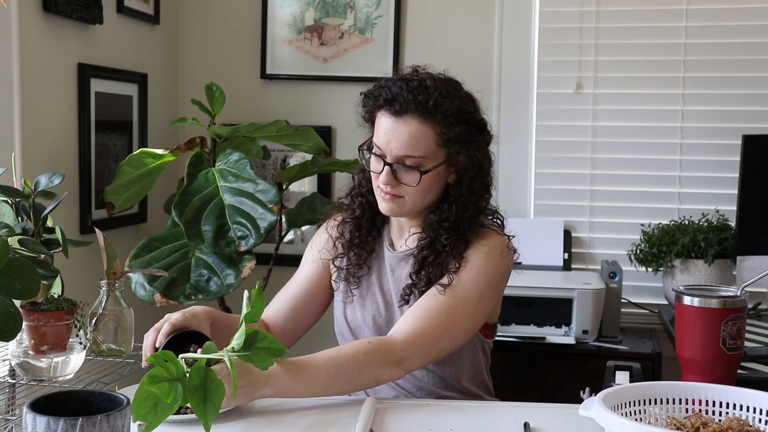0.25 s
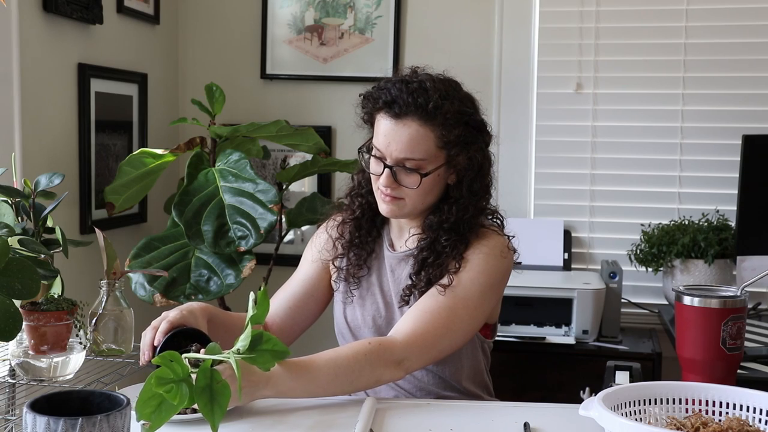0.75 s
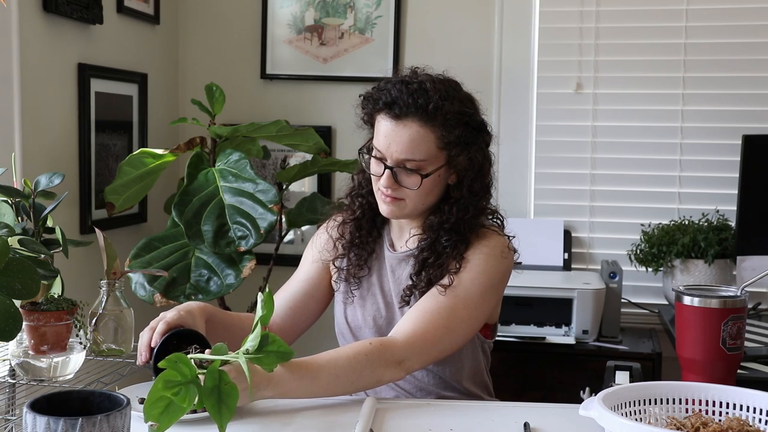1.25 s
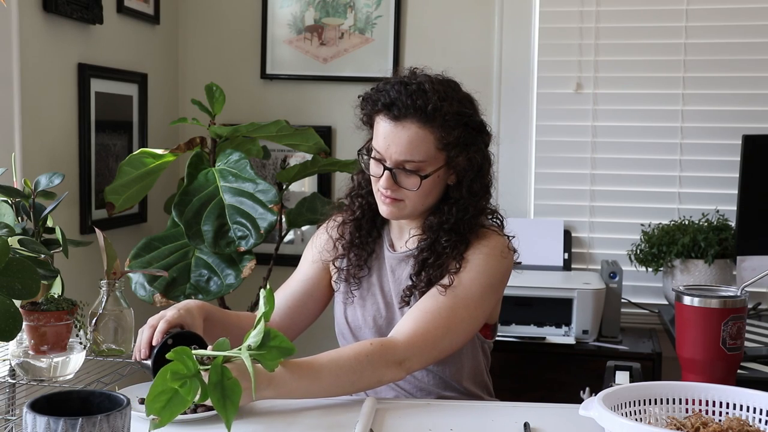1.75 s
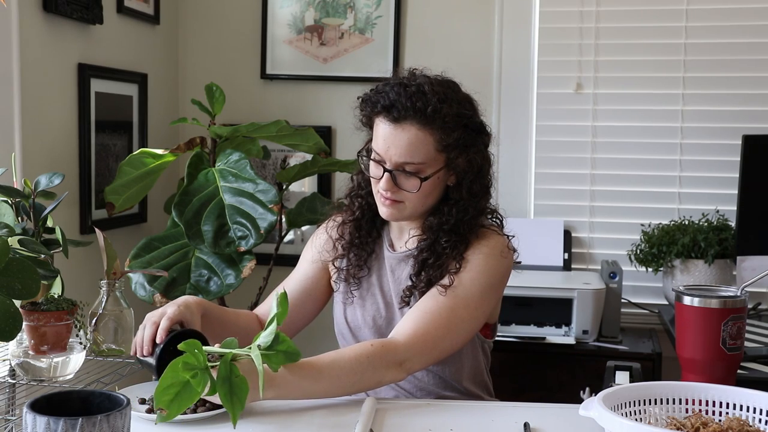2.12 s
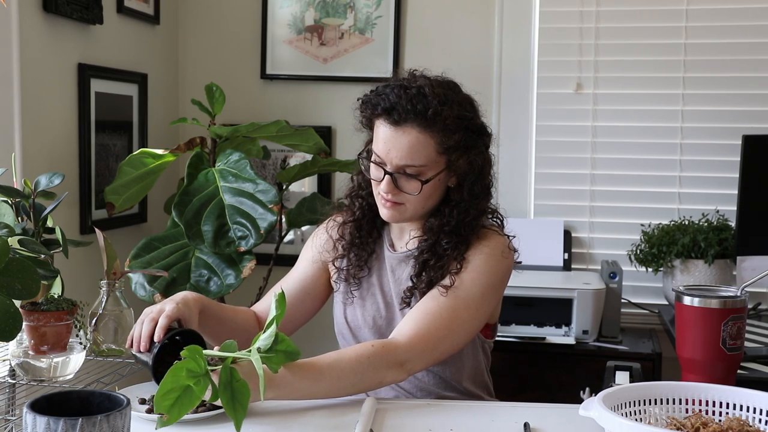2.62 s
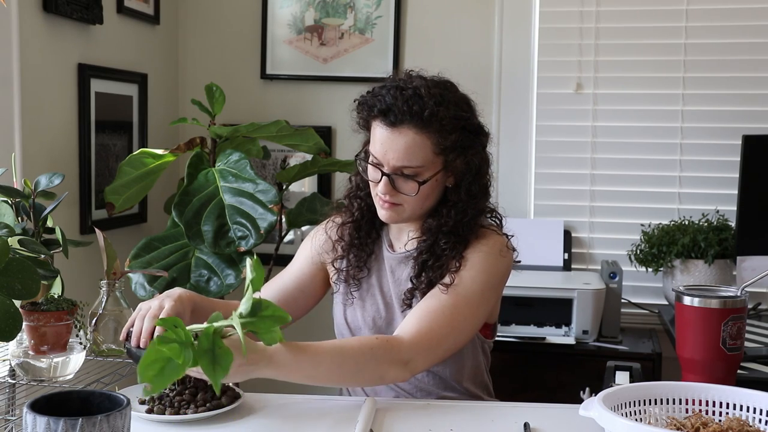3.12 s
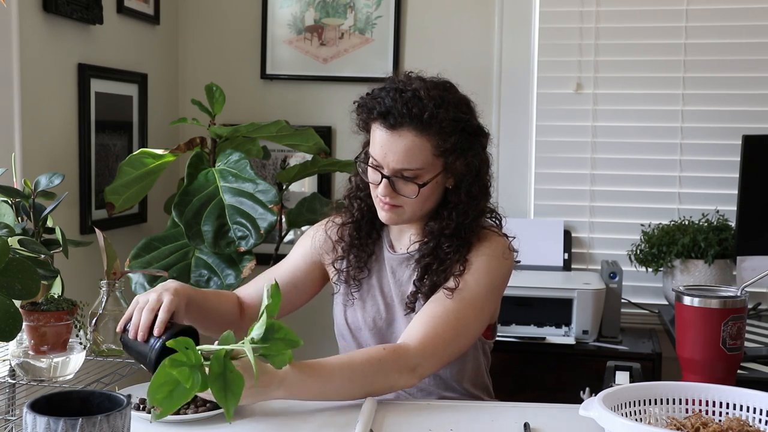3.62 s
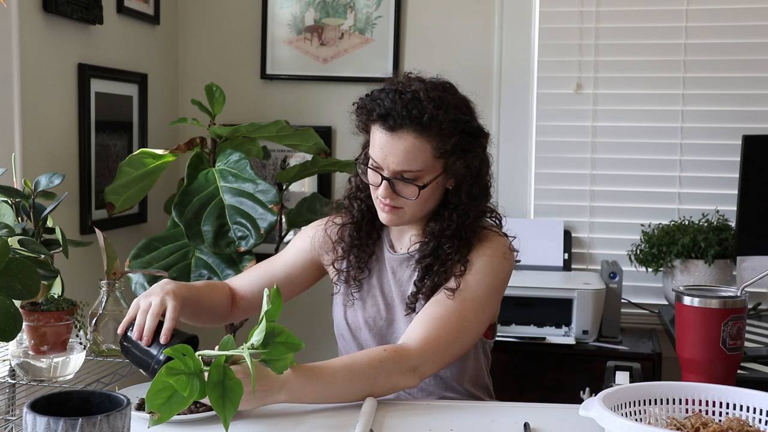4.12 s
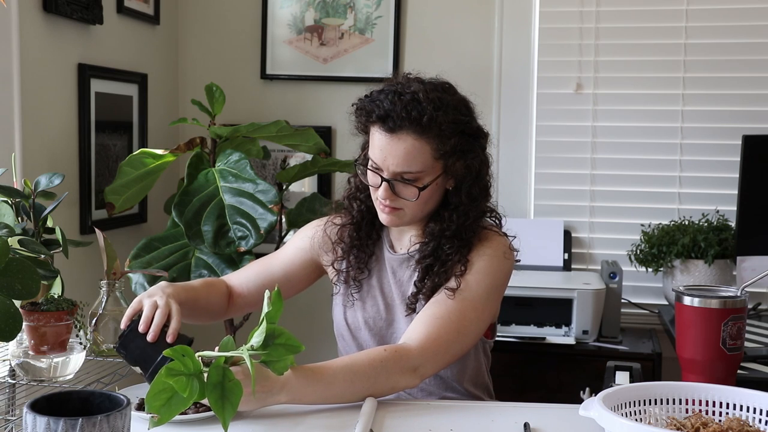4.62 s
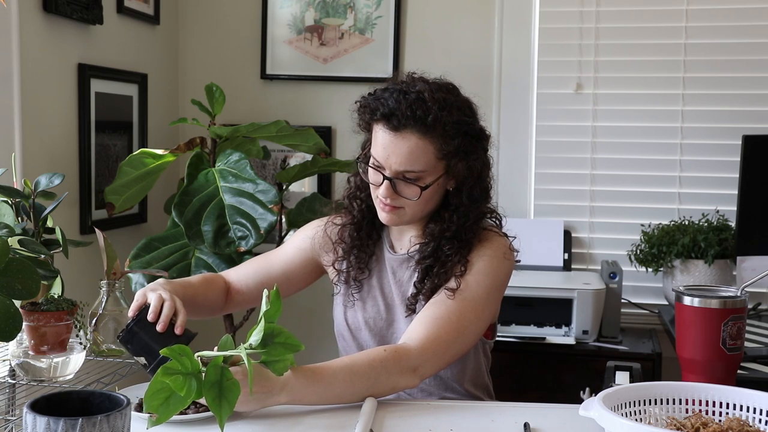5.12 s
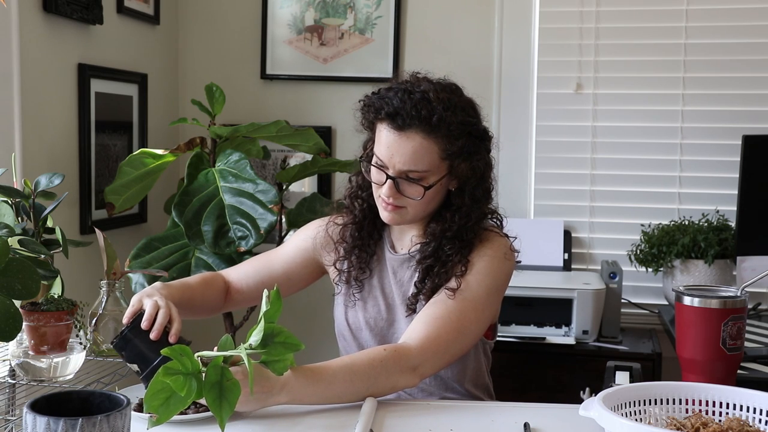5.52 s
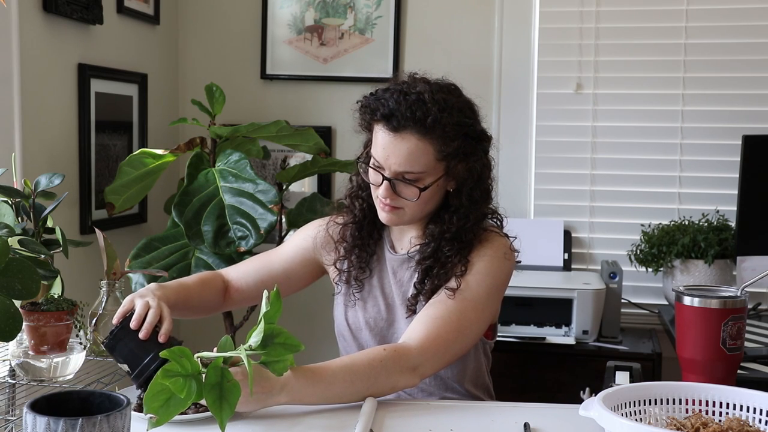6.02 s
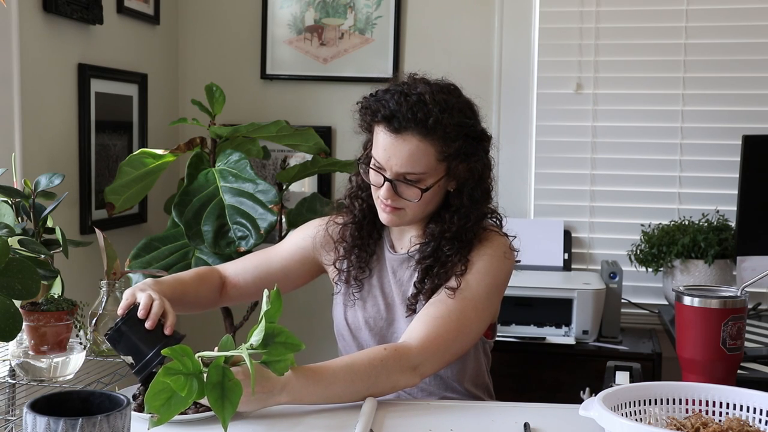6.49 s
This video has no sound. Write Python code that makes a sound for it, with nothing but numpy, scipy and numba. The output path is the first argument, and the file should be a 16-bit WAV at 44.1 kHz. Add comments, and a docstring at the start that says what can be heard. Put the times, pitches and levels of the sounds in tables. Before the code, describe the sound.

A small plant pot of porous clay pebbles is shaken and tipped over a ceramic plate indoors. Hollow, gritty scrapes alternate with single dry clicks, high glassy ticks, little bounces and thin trickles, with faint thuds beneath. Activity thins after two seconds, gathers in the middle, then peaks near five and a half with a bright tabletop crack before easing. Near microphone, short room tail, faint steady hush.

```python
"""In a small room, light clay pebbles are worked loose in a small plastic pot and tipped onto a glazed plate.
In the pot they grind and crackle: dense random contacts, coloured by filters, plus single dry clicks.
Falling pebbles tick as short noise and ring damped modes of the plate; they bounce, trickle and thud below.
One cracks onto the table as bright noise. The room adds a short diffuse tail and a soft hush of noise."""
import sys
import numpy as np
from scipy import signal
from scipy.fft import rfft, irfft
from scipy.io import wavfile
from scipy.ndimage import uniform_filter1d
from numba import njit

SR = 44100
rng = np.random.default_rng(int(sys.argv[2]) if len(sys.argv) > 2 else 0)


def dump_mix(stems):
    """Bounce the given channels to the path in sys.argv[1] as a 16-bit WAV at rate SR."""
    frames = np.atleast_2d(stems).T  # one column per channel
    limited = np.clip(frames, -1, 1)  # hard clip at full scale
    pcm = np.round(limited * 32767).astype(np.int16)
    wavfile.write(sys.argv[1], SR, pcm)


N = 297790
TIME = np.arange(N) / SR  # seconds

# room hush, spectral shape: freq_hz, level_db
HUSH_COLOUR = [(20, -1), (65, 3.5), (110, -4), (180, -11.5), (270, -10), (400, -15.5), (1200, -7.5),
               (2500, -12.5), (6000, -10.5), (10000, -38), (16000, -29)]
HUSH_DB = -59.5
# room decay: freq_hz, t60_s
ROOM_T60 = [(200, 1), (1500, 0.54), (4000, 0.33), (8000, 0.4), (15000, 0.44)]
TOP_HZ = 15900  # upper limit of the finished sound

# pebbles shifting as the pot is slowly turned: start_s, grinding_db, crackle_db (before the two gains below)
POT_TURNING = [(0.0, -45, -46.5), (0.88, -67.5, -65), (1.18, -54, -68), (1.35, -45, -43),
               (1.61, -59.5, -64), (1.86, -57, -59.5), (2.08, -53.5, -53.5), (2.41, -50.5, -54.5),
               (2.93, -53.5, -59), (3.33, -53.5, -52), (3.99, -59.5, -60), (4.75, -49, -51),
               (5.22, -54, -56), (5.53, -49, -55), (5.64, -50, -51), (5.81, -58, -56), (6.32, -53, -56.5),
               (6.75, -59, -64)]
GRIND_DB, CRACKLE_DB = 2, 4  # gains on the turning alone
# shakes that make the packed pebbles give way: start_s, length_s, grinding_db, crackle_db
POT_SHAKES = [(0.0, 0.086, -43.5, -51), (0.253, .025, -43.5, -49), (0.692, 0.044, -53, -48),
              (1.16, 0.078, -47, -51), (1.233, .11, -41.5, -42.5), (2.17, 0.042, -52, -52),
              (4.502, 0.027, -42.5, -47), (4.643, .04, -39, -54), (4.754, 0.014, -51, -43),
              (5.177, 0.036, -48, -43), (5.307, 0.078, -46, -53), (5.433, 0.16, -46, -41.5),
              (5.697, 0.086, -59, -45.5), (6.323, 0.037, -51, -62), (6.536, 0.059, -50, -51)]
SHAKE_ATTACK_S, SHAKE_RELEASE_S = 0.018, 0.011
# spectral shape of packed pebbles grinding: freq_hz, level_db
GRIND_COLOUR = [(30, -33), (130, -17.5), (260, -11), (400, -10.5), (740, -5.5), (950, -4), (1100, 0.5),
                (1330, 1), (1640, -6), (2300, -5.5), (3500, -11), (7000, -21.5), (16000, -32)]
# spectral shape of loose pebbles crackling: freq_hz, level_db
CRACKLE_COLOUR = [(30, -59), (300, -24), (1200, -10), (2400, 7), (4500, 3.5), (7500, 0.5), (9500, -8.5),
                  (13000, -16), (16000, -25)]

# dry clicks of pebble on pebble: start_s, level_db (before the gain in clicks), hardness_db_per_octave
PEBBLE_CLICKS = [(1.134, -32, 0), (1.5044, -30, -8), (2.341, -24.5, 11), (2.5616, -30, 5),
                 (2.7085, -34.5, 8), (3.0047, -32, 14), (3.128, -27, 5), (3.6587, -27, -5), (4.425, -24, 2),
                 (4.527, -34, -2), (4.759, -25.5, -3), (4.7857, -28, 6), (4.805, -28, -5), (4.959, -25, -4),
                 (5.3099, -16, -1), (5.341, -22, 8.5), (5.358, -21, -3), (5.424, -19, 2), (5.455, -21, 1),
                 (5.58, -22.5, -3), (6.033, -25.5, -3), (6.1777, -27, 2.5), (6.6052, -29, 4),
                 (6.625, -29, 2)]
# spectral shape of a click: freq_hz, level_db
CLICK_COLOUR = [(30, -24), (300, -10), (1200, -6.5), (4500, 7.5), (7500, 0), (10000, -13.5), (14000, -12),
                (16000, -38)]

# a pebble cracks onto the table: start_s, level_db (before the gain in table)
TABLE_HITS = [(5.6777, -16), (5.681, -25), (5.72, -35)]
# spectral shape of that crack: freq_hz, level_db
TABLE_COLOUR = [(30, -30), (240, -2.5), (600, -21), (1500, 2.5), (2400, 6), (5400, 9), (8000, 10),
                (10000, 0.5), (13500, -4.5), (16000, -21)]

# single contacts of pebbles with the plate: start_s, rim_ring_db, base_ring_db, hardness_db_per_octave
PLATE_HITS = [(0.0148, -55, -29.5, -7), (0.2433, -43, -28, -10), (0.4491, -55, -43.5, 12),
              (0.9291, -56, -38, -6.5), (1.1319, -50, -38.5, -2), (1.1848, -38, -46, -13),
              (1.242, -36, -28.5, -5.5), (1.286, -26, -34, -5), (1.3044, -33, -32, -7),
              (1.3531, -31.5, -44, -11), (1.7593, -61, -43.5, 1), (1.8868, -32, -37.5, -9),
              (1.9666, -37, -26, -3), (2.017, -52, -34, 0.5), (2.1816, -24, -55, -3),
              (2.1888, -25, -32, 0.5), (2.2928, -50, -24.5, -3.5), (2.3785, -28.5, -30, 1),
              (2.4371, -25.5, -40, 3.5), (2.561, -35, -54, -13.5), (3.1278, -60, -18.5, -5.5),
              (3.1817, -19, -39, -5), (3.2247, -23.5, -33, -9.5), (3.2696, -30, -38, -10),
              (3.3727, -55, -25.5, -1.5), (3.4025, -71, -25.5, -7.5), (3.471, -32, -52, -10),
              (3.5335, -28, -46, -4), (3.6444, -20, -31, -1), (3.6582, -31, -20.5, -1.5),
              (3.6938, -22.5, -48, -1.5), (3.7044, -24.5, -41, -3), (3.7389, -21.5, -36, 3),
              (3.8714, -70, -44, 5), (4.0708, -35, -28, 0), (4.127, -17.5, -29, 1.5), (4.3501, -31, -46, 0),
              (4.863, -51, -34, -6), (4.9188, -36, -38, 3), (5.1088, -35, -36, -4), (5.1723, -29, -33, 3.5),
              (5.1803, -22.5, -49, 2), (5.2771, -52, -34, -2.5), (5.4224, -23, -37, 6),
              (5.542, -20, -37, 0), (5.5623, -22, -26.5, -1), (5.5788, -15.5, -38, 5),
              (5.6588, -26, -50, 6), (5.9612, -36, -33, -6.5), (6.0457, -32, -32, 0.5),
              (6.1096, -44, -33, 3), (6.186, -29, -40, 4.5), (6.2585, -25, -31, 0.5),
              (6.3954, -20.5, -39, 1), (6.4602, -35, -36, 4.5)]
# bounce series: first_contact_s, last_contact_s, rim_ring_db, base_ring_db, hardness_db_per_octave,
# speed_kept (share), contacts (count); the levels are those of the first contact
BOUNCERS = [(0.0794, 0.1203, -18, -27, -8, 0.48, 2), (0.2725, 0.4615, -20.5, -29.5, -0.5, 0.76, 4),
            (0.5547, 0.611, -65, -33.5, -7, 0.45, 2), (0.6887, 0.7225, -41.5, -33, -1, 0.91, 3),
            (1.504, 1.5682, -55, -31, -2, 1, 3), (3.0272, 3.0645, -46, -29.5, -3, 0.58, 2),
            (3.2893, 3.327, -34, -21.5, -3, 0.47, 2), (3.5483, 3.5955, -23.5, -37, -2, .56, 2),
            (4.202, 4.2974, -19, -49, -1.5, 0.83, 5), (4.4237, 4.457, -31, -31.5, -0.5, .6, 2),
            (5.4869, 5.518, -17.5, -30, 1, 0.4, 2)]
BOUNCE_DB = 6  # a blow weakens by this much each time the speed halves
# runs of small pebbles trickling onto the plate: start_s, length_s, level_db
SPILLS = [(0.0, 0.041, -39), (0.43, 0.088, -54), (1.26, .14, -41), (1.5, 0.11, -46.5), (2.04, 0.58, -51.5),
          (3.22, 0.36, -45.5), (3.72, 0.048, -49), (4.66, 0.395, -52.5), (5.31, 0.21, -46),
          (6.08, 0.1, -47), (6.33, 0.13, -54.5)]
SPILL_ATTACK_S, SPILL_RELEASE_S = 0.018, 0.033
STRAY_DB = -16  # stray pebbles that trickle all along, relative to grinding_db of the turning

# spectral shape of the tick of clay on glaze: freq_hz, level_db
TICK_COLOUR = [(30, -43), (150, -16), (250, -12.5), (450, -9.5), (700, -19), (1100, -13.5), (2300, -4.5),
               (3000, -14), (4000, 0), (5800, 2.5), (7000, 0.5), (7900, 4), (9200, -20), (13500, -8.5)]
TICK_DB = -9
SOFT_HZ = 1340  # below this, soft and hard contacts push alike

# Plate modes: pitch_hz is the centre of a wandering pitch, t60_s is scaled by PLATE_FREE.
# the glazed rim rings on: pitch_hz, level_db, t60_s
RIM_MODES = [(2266, -20.5, 0.073), (3520, -3, 0.035), (3720, -15, .012), (4893, -6, 0.039),
             (8020, -20, 0.085), (4932, -22, .17), (6428, -20, .35), (8126, -18.5, .18), (14332, -32, .13),
             (9960, -26, 0.11), (11140, -32, 0.14), (12075, -22.5, 0.076), (12800, -23, 0.036),
             (13750, -34, 0.098)]
# the plate's centre: pitch_hz, level_db, t60_s
CENTRE_MODES = [(1100, -30, 0.097), (2135, -9.5, 0.017), (3567, -4.5, 0.03), (5528, -3, 0.042)]
# the base, damped by the table and the heap: pitch_hz, level_db, t60_s
BASE_MODES = [(7620, -4, .022), (7740, -10, .05), (7985, -5.5, .055), (10290, -16, .07), (10430, -19, .04),
              (10785, -19, .09), (13480, -15, .035), (13745, -16, .06)]
# how freely the plate rings while hand and heap rest on it: start_s, ring_time_share
PLATE_FREE = [(0, 0.67), (.5, 0.52), (.7, 1.13), (2.0, 0.61), (3.2, 1.23), (4.2, 0.65), (5.6, 0.97),
              (6.7, 0.78)]
# the shifting heap covers more or less of the plate's centre: start_s, level_db
HEAP = [(0, -0.5), (0.4, -6), (0.55, 3), (1.6, 1), (2.4, -4.5), (3.2, -6.5), (4.1, -0.5), (5.4, -0.5),
        (6.7, -2.5)]
# the landing place wanders along the rim, favouring one mode at the cost of the next: start_s, favour_db
LANDING_SPOT = [(0.1, 0.5), (0.4, 6.5), (0.9, -7), (1.3, 5.5), (1.9, -11), (2.2, 4.5), (2.56, 3), (3.2, -9),
                (3.72, 2.5), (4.3, 0.5), (5.5, 0.5), (6.4, 1)]
SPOT_HZ, NEXT_HZ = 4900, 6428  # the favoured mode and the next
NEXT_SHARE = 0.87  # dB that the next mode loses for each dB gained
# pebbles thud through the plate into the table top: pitch_hz, level_db, t60_s
TABLE_MODES = [(172, -46, 0.065), (237.4, -37, 0.1), (277, -40, 0.21), (406, -27, 0.032)]


def undb(db):
    """Decibels to gain."""
    return 10 ** (np.asarray(db) / 20)


def unit(x):
    """Scale to rms 1."""
    return x / np.sqrt(np.mean(x ** 2))


def decay(t, t60):
    """Exponential fall of 60 dB in t60 seconds."""
    return np.exp(-np.log(1000) * t / t60)


def on_octaves(hz, points):
    """Read (Hz, value) points on a log-frequency axis."""
    f, value = np.transpose(points)
    return np.interp(np.log(np.maximum(hz, 1)), np.log(f), value)


def colour(x, points, tilt_db=0, size=1024):
    """Causal filter of unit energy with the given spectrum, tilted above SOFT_HZ in dB per octave."""
    hz = np.fft.rfftfreq(size, 1 / SR)
    level_db = on_octaves(hz, points) + tilt_db * np.log2(np.maximum(hz, SOFT_HZ))
    # folding the cepstrum forward gives minimum phase: the energy comes as early as it can
    cepstrum = irfft(np.log(undb(level_db)))
    cepstrum[1:size // 2] *= 2
    cepstrum[size // 2 + 1:] = 0
    response = irfft(np.exp(rfft(cepstrum)))
    return signal.fftconvolve(x, response / np.linalg.norm(response))[:len(x)]


def shelf(x, low_db, corner_hz=2200):
    """Raise or lower everything below the corner."""
    lows = signal.lfilter(*signal.butter(1, corner_hz, fs=SR), x)
    return x + (undb(low_db) - 1) * lows


def add(track, s, sound):
    """Mix a sound into a track at time s."""
    i = max(int(s * SR), 0)
    track[i:i + len(sound)] += sound[:max(N - i, 0)]


def walk(per_s):
    """Random levels held 1 / per_s seconds and slewed; rms 1."""
    hold = int(SR / per_s)
    stepped = rng.standard_normal(N)[np.arange(N) // hold]
    return unit(uniform_filter1d(stepped, hold))


def swells(rows, attack_s, release_s):
    """Gain of (s, length s, dB) movements: each rises, holds and dies away."""
    total = 0
    for s, length, db in rows:
        rise = np.clip((TIME - s) / attack_s, 0, 1)
        fall = np.exp(-np.maximum(TIME - s - length, 0) / release_s)
        total = total + undb(db) * rise * fall
    return total


def burst(t60, size=2048):
    """The crack of one contact: noise that dies within milliseconds."""
    return rng.standard_normal(size) * decay(np.arange(size) / SR, t60)


def contacts(per_s, spread_db):
    """Random contacts, mostly faint and a few strong; rms 1."""
    happens = rng.random(N) < per_s / SR
    strength = np.minimum(rng.exponential(size=N), 4)
    sign = rng.choice([-1, 1], N)
    return unit(happens * sign * undb(spread_db * strength))


def grains(per_s, spread_db, t60, count=6):
    """Dense contacts shared among pebbles that each have their own brief ring."""
    total = 0
    for _ in range(count):
        pushes = contacts(per_s / count, spread_db)
        total = total + signal.oaconvolve(pushes, unit(burst(t60)))[:N]
    return unit(total)


def knock(modes, size=8192):
    """Damped sines of a struck body."""
    t = np.arange(size) / SR
    return sum(undb(db) * decay(t, t60) * np.sin(2 * np.pi * hz * t) for hz, db, t60 in modes)


@njit
def ring(push, hz, t60):
    """One mode, a rotating and shrinking phasor whose pitch and decay time may change while it rings."""
    out, z = np.empty(len(push)), 0j
    for i in range(len(push)):
        z = z * np.exp((2j * np.pi * hz[i] - np.log(1000) / t60[i]) / SR) + push[i] + 1e-18
        out[i] = z.real
    return out


def room_hush():
    """Steady noise in the colour of the quiet room."""
    return undb(HUSH_DB) * colour(rng.standard_normal(N), HUSH_COLOUR, size=4096)


def room(x, gap_s=0.0025, build_s=0.0022, size=24000, count=9):
    """Diffuse tail of a small room: it builds up after a short gap, each band dying at its own rate."""
    t, hz = np.arange(size) / SR, np.fft.rfftfreq(size, 1 / SR)
    noise = rfft(rng.standard_normal(size))
    edges = np.geomspace(100, SR / 2, count + 1)
    tail = 0
    for lo, hi in zip(edges, edges[1:]):
        t60 = on_octaves(np.sqrt(lo * hi), ROOM_T60)
        band = irfft(noise * (hz >= lo) * (hz < hi))
        tail = tail + band * decay(t, t60)
    # keep only the phases, so that the tail has no strong peaks or dips
    phase = np.exp(1j * np.angle(rfft(tail, 2 * size)))
    # energy follows the decay time
    level = np.sqrt(on_octaves(np.fft.rfftfreq(2 * size, 1 / SR), ROOM_T60))
    tail = irfft(phase * level)[:size]
    tail = tail * (1 - np.exp(-np.maximum(t - gap_s, 0) / build_s))
    return signal.fftconvolve(x, tail / np.linalg.norm(tail))[:N]


def tipping():
    """Gains of grinding, crackle and trickle: slow turning of the pot, with shakes and spills on top."""
    s, *levels = np.transpose(POT_TURNING)
    grind, crackle = (undb(np.interp(TIME, s, db)) for db in levels)
    start, length, *strengths = np.transpose(POT_SHAKES)
    jolt, slide = (swells(zip(start, length, db), SHAKE_ATTACK_S, SHAKE_RELEASE_S) for db in strengths)
    spill = swells(SPILLS, SPILL_ATTACK_S, SPILL_RELEASE_S)
    # independent movements add in power
    grinding = np.hypot(undb(GRIND_DB) * grind, jolt)
    sliding = np.hypot(undb(CRACKLE_DB) * crackle, slide)
    flow = np.hypot(undb(STRAY_DB) * grind, spill)
    return grinding, sliding, flow


def pot(grinding, sliding):
    """Packed pebbles grind, hollow in the pot; loose ones crackle as they slide over each other."""
    slip = walk(per_s=40)  # the mass jams and gives way in short scrapes
    grind = colour(grains(per_s=800, spread_db=3.0, t60=0.016), GRIND_COLOUR)
    crackle = colour(grains(per_s=760, spread_db=2.0, t60=0.0075), CRACKLE_COLOUR)
    return grind * grinding * undb(2.84 * slip) + crackle * sliding * undb(1.6 * slip)


def clicks():
    """Porous clay hardly rings: pebble on pebble is a dry click."""
    out = np.zeros(N)
    for s, db, hardness in PEBBLE_CLICKS:
        add(out, s, undb(db - 3.5) * colour(burst(t60=0.01), CLICK_COLOUR, hardness))
    return out


def table():
    """A bright crack on the table top: coloured noise bursts in quick succession."""
    out = np.zeros(N)
    for s, db in TABLE_HITS:
        add(out, s, undb(db - 1) * burst(t60=0.022))
    return colour(out, TABLE_COLOUR)


def falls():
    """Every listed contact with the plate; a bounce keeps a share of the speed, which sets flight and blow."""
    rows = list(PLATE_HITS)
    for first, last, rim_db, base_db, hardness, kept, touches in BOUNCERS:
        speed = kept ** np.arange(round(touches))
        flown = np.cumsum(speed) - speed  # each flight lasts in proportion to its speed
        times = first + (last - first) * flown / flown[-1]
        for s, loss_db in zip(times, BOUNCE_DB * np.log2(speed)):
            rows.append((s, rim_db + loss_db, base_db + loss_db, hardness))
    return rows


def near(hz, mode_hz):
    """1 if a frequency lies within 6 % of that mode, else 0."""
    return float(abs(hz / mode_hz - 1) < 0.06)


def plate_part(modes, hit_db, trickle, scatter_db, detune, pivot_hz=5000):
    """Hits and trickle ring one family of modes; each landing spot favours the modes differently."""
    s, _, _, hardness = np.transpose(falls())
    free = np.interp(TIME, *np.transpose(PLATE_FREE))
    spot_db = np.interp(s, *np.transpose(LANDING_SPOT))
    landings = np.flatnonzero(trickle)
    out = 0
    for hz, db, t60 in modes:
        push = np.zeros(N)
        push[landings] = trickle[landings] * rng.standard_normal(N)[landings]
        scatter, side = rng.standard_normal((len(s), 2)).T
        favour = near(hz, SPOT_HZ) - NEXT_SHARE * near(hz, NEXT_HZ)
        place_db = scatter_db * scatter + spot_db * favour
        # a harder contact is shorter and reaches the higher modes
        hard_db = hardness * np.log2(max(hz, SOFT_HZ) / pivot_hz)
        push[(s * SR).astype(int)] += np.sign(side) * undb(hit_db + hard_db + place_db)
        # the shifting heap loads the plate and smears its pitches
        pitch = hz * (1 + detune * walk(per_s=45))
        out = out + undb(db) * ring(push, pitch, t60 * free)
    return out


def plate(flow):
    """Each falling pebble ticks, rings the plate and thuds below; small ones trickle in between."""
    times, rim_db, base_db, _ = np.transpose(falls())
    blow = np.hypot(undb(rim_db), undb(base_db))
    heap_db = np.interp(times, *np.transpose(HEAP))
    trickle = contacts(per_s=180, spread_db=2.0) * flow
    rim = plate_part(RIM_MODES, rim_db, trickle * undb(-19), scatter_db=1.2, detune=0.0018)
    centre = plate_part(CENTRE_MODES, base_db + heap_db, trickle * undb(-20), scatter_db=2.7, detune=0.0078)
    base = plate_part(BASE_MODES, base_db, trickle * undb(-21), scatter_db=4.0, detune=0.0046)
    thud = knock(TABLE_MODES)
    ticks = np.zeros(N)
    thuds = undb(-9) * signal.oaconvolve(trickle, thud)[:N]
    for (s, _, _, hardness), size in zip(falls(), blow):
        add(ticks, s, size * colour(burst(t60=0.009), TICK_COLOUR, hardness))
        add(thuds, s, size * thud)
    # a small plate radiates little bass
    rings = signal.sosfilt(signal.butter(2, 350, "high", fs=SR, output="sos"), rim + centre + base)
    # light clay drives little extreme treble
    chinks = signal.sosfilt(signal.butter(5, 14600, fs=SR, output="sos"), rings + undb(TICK_DB) * ticks)
    return chinks + undb(-4) * thuds


def scene():
    """Pot, plate and table in the room, over its steady hush."""
    grinding, sliding, flow = tipping()
    chinks = plate(flow)
    rattle = pot(grinding, sliding) + clicks()
    crack = table()
    walls = room(undb(-5) * chinks + undb(-8) * rattle + undb(0.5) * crack)
    # the direct sound gives up some lows; the walls keep theirs
    direct = shelf(chinks + rattle + crack, low_db=-4)
    return (direct + walls + room_hush())[None]


def record(dry):
    """A steep low-pass cuts the top of the treble."""
    return signal.sosfilt(signal.ellip(10, 0.2, 70, TOP_HZ, fs=SR, output="sos"), dry)


dry = scene()
out = record(dry)
dump_mix(out)
```